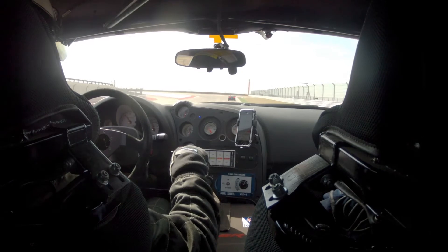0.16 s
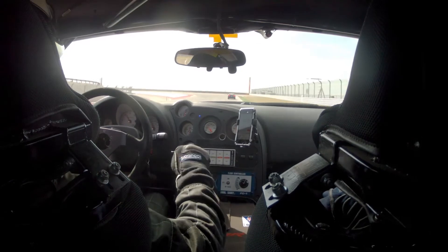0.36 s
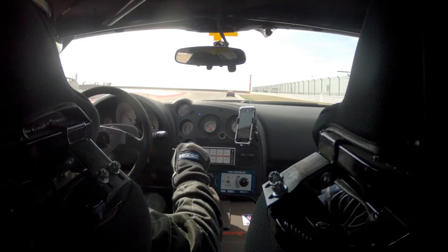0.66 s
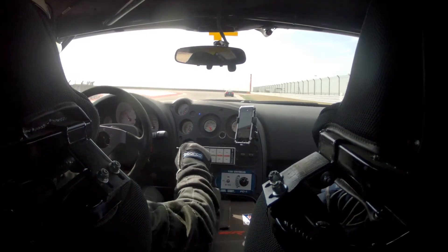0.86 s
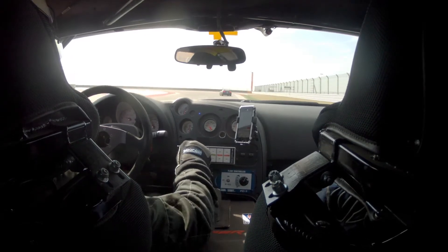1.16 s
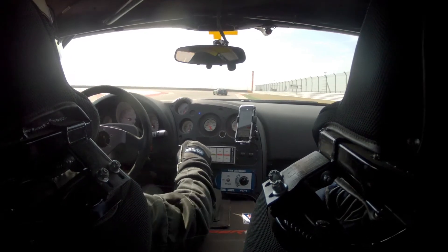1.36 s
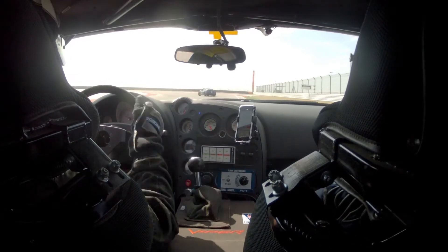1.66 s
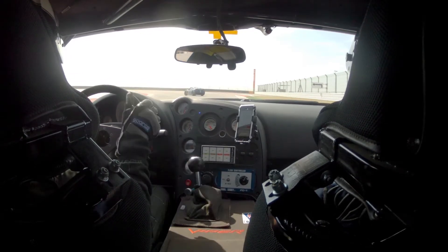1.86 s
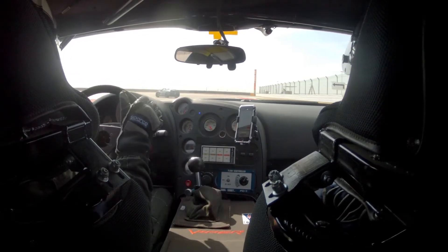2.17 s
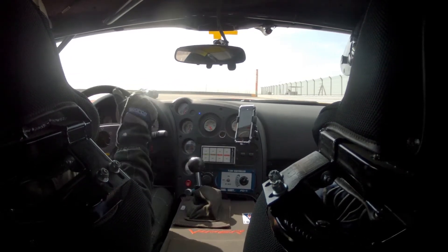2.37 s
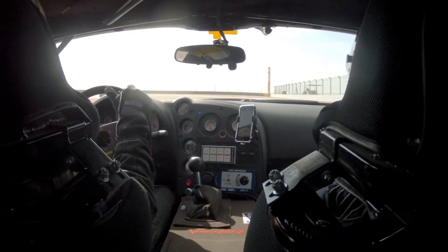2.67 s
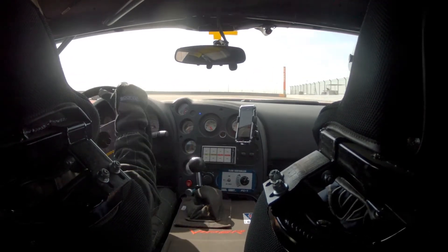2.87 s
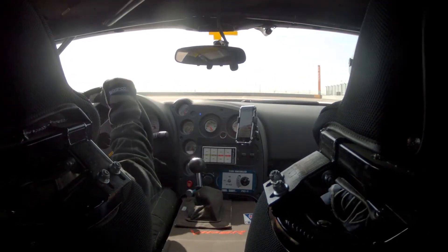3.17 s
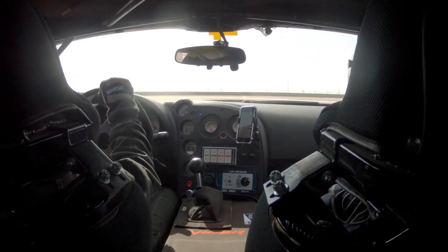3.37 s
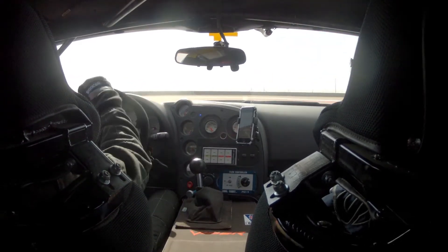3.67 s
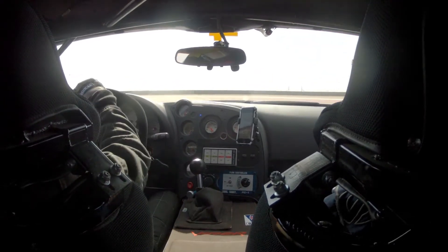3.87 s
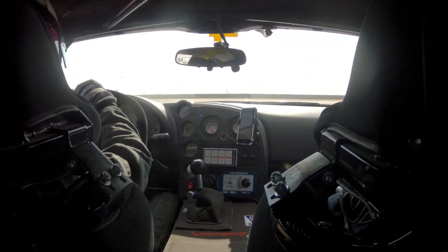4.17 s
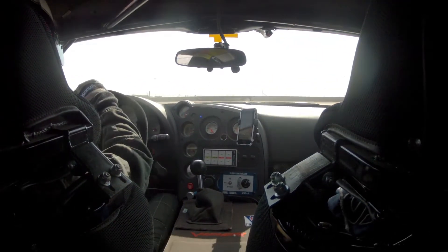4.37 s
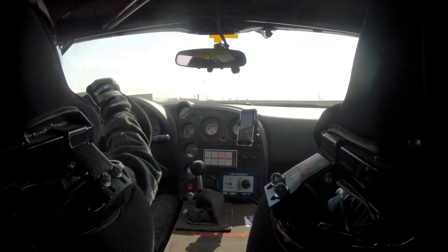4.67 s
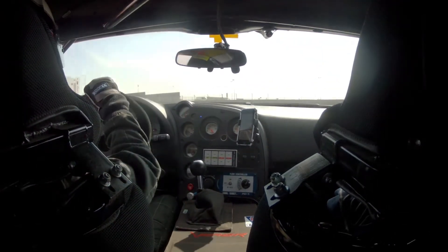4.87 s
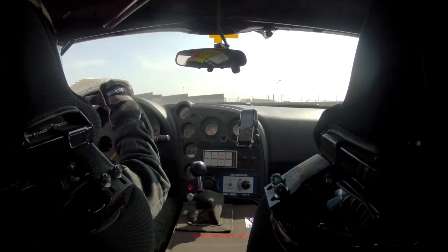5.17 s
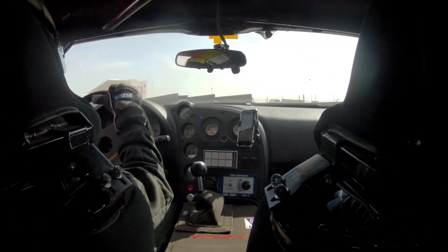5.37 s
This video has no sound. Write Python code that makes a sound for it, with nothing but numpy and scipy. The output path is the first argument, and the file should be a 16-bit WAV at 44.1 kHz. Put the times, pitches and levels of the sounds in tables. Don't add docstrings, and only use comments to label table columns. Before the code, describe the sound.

Inside a race car cabin, a deep booming engine brakes down from high revs, blips for a downshift, coasts lower, then pulls away as stones crack underneath.

```python
import sys
import numpy as np
from scipy import signal
from scipy.fft import rfft, irfft, next_fast_len
from scipy.io import wavfile
from scipy.ndimage import uniform_filter1d

SR = 44100
rng = np.random.default_rng(int(sys.argv[2]) if len(sys.argv) > 2 else 0)


def gain_from_decibels(decibels):
    exponent = np.asarray(decibels, float) / 20
    return 10 ** exponent


def waveform_to_disk(signal):
    frames = np.transpose(np.atleast_2d(signal))
    scaled = np.clip(frames, -1, 1) * 32767
    samples = np.round(scaled).astype(np.int16)
    wavfile.write(sys.argv[1], SR, samples)


N = 243873
TONE_STEP = 8

# time_s, firing_hz
FIRING_RATE = [(0, 174.4), (.4, 177), (.52, 172), (.8, 167), (1.12, 133), (1.29, 125.5), (1.45, 151.5),
               (1.59, 188.5), (1.73, 171.5), (2.0, 162), (2.45, 141), (2.85, 120.5), (3.38, 103.8),
               (4.18, 101.5), (4.35, 104.8), (4.73, 107), (4.95, 112.5), (5.53, 119.7)]
# time_s, load (1 full throttle, 0 coasting in gear, below 0 clutch in)
ENGINE_LOAD = [(0, 1), (.27, 0.77), (.39, -0.023), (.85, -0.08), (1.05, -0.31), (1.22, -0.7), (1.33, 0.27),
               (1.44, 0.8), (1.53, 0.19), (1.7, 0.17), (1.9, 0.12), (2.7, -0.097), (4.1, 0.14), (4.27, .75),
               (4.75, 0.71), (5.1, 1), (5.3, 0.92), (5.53, 0.97)]
# time_s, speed_kmh
ROAD_SPEED = [(0, 165), (.6, 139), (1.65, 106.3), (3.4, 67), (4.2, 71), (5.53, 104)]

# tone_hz, coasting_db, full_throttle_db
FIRING_GAIN = [(96.4, -23, -22), (105, -18.5, -12.5), (114.2, -14.5, -13.5), (122, -13.5, -13.5),
               (125.8, -18.5, -12), (141, -13.5, -14.5), (150, -11, -10), (182.5, -14.5, -14.5)]
# tone_hz, coasting_db, full_throttle_db
SECOND_GAIN = [(197.5, -37.5, -30.5), (227, -30, -24.5), (238.7, -34.5, -25), (253.5, -28, -24),
               (256.6, -36.5, -28), (325.5, -27.5, -20.5), (339, -38, -23), (343, -37, -19.5)]
# tone_hz, coasting_db, full_throttle_db
THIRD_GAIN = [(300, -49, -40), (324.6, -37.5, -19), (349, -51.5, -28), (372, -43, -36.5), (450, -47.5, -33),
              (544, -44, -48)]
# firing_hz, coasting_db, full_throttle_db
CRANK_GAIN = [(104, -50.5, -23.5), (120, -39.5, -35), (166, -36, -34), (187, -36, -22.5)]
# turns_per_rev, level_db
CRANK_ORDERS = [(1, 10.5), (2, -6.5), (3, -12.5), (4, -4.5), (6, -4.5), (7, -5.5), (8, -1), (9, -1),
                (11, -4), (14, -1.5), (19, 0.5), (20, 0), (21, -3.5), (24, -2.5), (25, 0.5), (27, -12),
                (29, -13.5), (30, -3), (35, 0.5), (38, -6), (40, -3), (45, 0.5), (50, -4)]
# time_s, boom_db, half_length_s
DRIVE_STUMBLES = [
    (0.402, -6, 0.023),
    (1.279, -8.5, 0.056),
    (1.576, -7.5, 0.051),
    (3.45, -0.5, 0.075),
    (3.753, -3, 0.043),
    (3.818, 3.5, 0.03),
    (3.897, -6, 0.065),
    (4.016, -10, 0.1),
]

# centre_hz, width_hz, gain_db
CABIN_PANELS = [(733.4, 30, 11.5), (830, 55, 3.5), (1022, 62, 6), (145.4, 42, 10.5), (320, 29, 8.5)]
# tone_hz, left_minus_right_db, left_lead_rad
STANDING_WAVES = [(100, -6, -.3), (106, -4.4, -.45), (112, -2.6, -.8), (121, -2.3, -1.35), (130, -8, -2.2),
                  (140, -6, -1.35), (153, -1.2, -.95), (163, -3, -.6), (173, -8, -.5), (185, -9.5, -.65),
                  (210, -7, -.7), (240, -1.2, -.05), (330, -3, .4), (600, -2.2, .05)]
# freq_hz, likeness_0_1
NOISE_LIKENESS = [(30, .7), (75, 0.63), (500, 1), (1000, 0.6), (1600, 0.83), (2500, 0.7), (4000, 0.38),
                  (6500, 0.25), (12000, .22)]
# freq_hz, left_lead_rad
NOISE_LEAD = [(40, 0.11), (500, -1.38), (1600, 0.61), (4000, 0.55), (7000, .68)]
# freq_hz, left_minus_right_db
NOISE_BALANCE = [(30, -5.5), (100, -1.5), (250, -1.5), (1000, -3), (2000, -2.5), (4000, -2.5), (8000, -0.3),
                 (12000, -1)]

# freq_hz, density_db_per_hz
RUMBLE_SPECTRUM = [(10, -20), (22, -1.5), (40, 12), (52, -2), (65, 3.5), (85, -8), (130, -44), (220, -120)]
# freq_hz, density_db_per_hz
BODY_SPECTRUM = [(50, -34), (80, -2), (150, 5), (200, -5), (260, -9), (400, -9), (600, -38), (900, -120)]
# freq_hz, density_db_per_hz
ROAR_SPECTRUM = [(150, -21), (380, -8.5), (510, -8.5), (690, 0.5), (770, -5.5), (830, -1.5), (1050, -4),
                 (1300, -9), (1650, -11), (2200, -22.5), (3000, -32.5), (4500, -45.5), (6500, -110)]
# freq_hz, density_db_per_hz
HISS_SPECTRUM = [(600, -65.5), (1200, -4), (2300, -0.5), (3200, -7.5), (4300, -12), (5700, -19),
                 (8000, -28.5), (12000, -53.5), (15000, -91)]
# freq_hz, density_db_per_hz
AIR_SPECTRUM = [(3000, -41.5), (5500, -2.5), (8000, -3.5), (10500, -5.5), (13000, -14), (15500, -30)]
# time_s, rumble_db, half_length_s
ROUGH_PATCHES = [(0, -37, 0.048), (.8, -30, 0.29), (1.288, -22.5, 0.08), (1.61, -21, 0.043),
                 (2.147, -31.5, .08), (2.544, -33, 0.03), (3.466, -31, .05), (4.25, -39, .1),
                 (4.89, -31, 0.055), (5.1, -24, 0.12)]
# time_s, gust_db, half_length_s
WIND_GUSTS = [
    (.58, 2, .06),
    (2.404, 4, 0.26),
]

# time_s, knock_db, thud_db, crack_db
STONE_STRIKES = [(0.5312, -18, -31, -53.5), (0.5832, -20.5, -38, -52.5), (0.8685, -14, -16, -38.5),
                 (0.9494, -15, -19, -46.5), (2.7594, -34, -33, -55.5), (3.1374, -51, -45, -55),
                 (3.214, -29.5, -38, -45.5), (3.357, -24, -37, -44.5), (3.4233, -22.5, -22.5, -41.5),
                 (3.4414, -28, -15, -50), (3.483, -14, -19.5, -45.5), (3.801, -9, -18, -55),
                 (3.887, -20.5, -32, -41.5), (3.9738, -40, -31, -51.5), (3.996, -15, -11, -49),
                 (4.0133, -34, -18, -60.5), (4.0694, -50, -37, -55.5), (4.151, -42, -26, -50.5),
                 (4.1733, -10.5, -17.5, -52.5), (4.2114, -28.5, -31, -42), (4.3312, -8, -16.5, -46.5),
                 (4.8982, -15, -19.5, -45.5), (4.9732, -25, -17.5, -47.5), (5.015, -13, -16, -47),
                 (5.1215, -12, -22, -46.5), (5.1615, -15, -19, -48), (5.178, -21, -17, -48),
                 (5.2775, -13.5, -19, -41.5)]
# freq_hz, density_db_per_hz
KNOCK_SPECTRUM = [(900, -51.5), (1300, -7.5), (1640, 6), (1900, -5.5), (2400, -24), (3500, -57),
                  (5000, -110)]
# freq_hz, density_db_per_hz
THUD_SPECTRUM = [(150, -38.5), (400, -6), (700, -7), (1050, -3.5), (1300, -10), (2000, -20), (3000, -61),
                 (4500, -110)]
# freq_hz, density_db_per_hz
SNAP_SPECTRUM = [(1300, -41.5), (2200, 1), (2600, 0.5), (3500, -1), (4800, -6.5), (6000, -22.5),
                 (9000, -63), (12000, -110)]
# freq_hz, density_db_per_hz
CRACK_SPECTRUM = [(2500, -42.5), (5000, -4.5), (7000, 1), (10000, -2.5), (13000, -9), (15500, -15)]

# start_s, end_s, centre_hz, width_hz, level_db, likeness_0_1
RESONANCES = [
    (0.88, 1.4, 9500, 45, -64, .3),
    (1.27, 1.38, 10700, 260, -60, 0.2),
    (2.17, 2.72, 9480, 50, -67, .3),
    (4.8, 5.33, 49, 3.2, -29, 0.9),
    (1.51, 1.59, 735, 43, -27.5, 0.8),
    (1.37, 1.46, 1030, 250, -28, 0.9),
    (4.326, 4.348, 2550, 310, -28, 0.5),
    (.949, .968, 1620, 200, -28, 0.7),
    (4.3, 5.53, 2520, 330, -49, 0.6),
    (4.5, 5.53, 8200, 900, -63, 0.4),
]


def evened(x):
    return x / np.sqrt(np.mean(x ** 2) + 1e-20)


def read(points, hz, column=1):
    table = np.transpose(points)
    return np.interp(np.log(hz + 1), np.log(table[0] + 1), table[column])


def curve(rows, column=1, step=1):
    table = np.transpose(rows)
    return np.interp(np.arange(0, N, step) / SR, table[0], table[column])


def swell(time_s, half_s, step=1):
    return np.exp(-((np.arange(0, N, step) / SR - time_s) / half_s) ** 2)


def waver(rate_hz, count):
    knots = rng.standard_normal((count, 400))
    position = np.arange(0, N, TONE_STEP) / SR * rate_hz
    return [np.interp(position, np.arange(len(row)), row) for row in knots]


def wash(spectrum, patchy_db, flicker_db, size=1024):
    frames = 4 * N // size + 5
    hz = np.fft.rfftfreq(size, 1 / SR)
    a, b, c, d, patches = rng.standard_normal((frames, len(hz), 5)).T
    patches = uniform_filter1d(patches, size=10, axis=0)
    patches = evened(uniform_filter1d(patches, size=10, axis=1))
    flicker = evened(uniform_filter1d(rng.standard_normal(frames), size=3))
    same = np.clip(read(NOISE_LIKENESS, hz), 0, 1)[:, None]
    left = a + 1j * b
    right = same * left + np.sqrt(1 - same ** 2) * (c + 1j * d)
    half = (gain_from_decibels(read(NOISE_BALANCE, hz) / 2) * np.exp(.5j * read(NOISE_LEAD, hz)))[:, None]
    gain_db = read(spectrum, hz)[:, None] + patchy_db * patches + flicker_db * flicker
    bins = np.array([left * half, right / half]) * gain_from_decibels(gain_db)
    pair = signal.istft(bins, nperseg=size, noverlap=3 * size // 4)[1][:, :N]
    return pair / np.std(pair.mean(0))


def rush(road_db, per_speed, intake_db, throttle_db, per_rev):
    rolling = gain_from_decibels(road_db) * (curve(ROAD_SPEED) / 100) ** per_speed
    throttle_gain = gain_from_decibels(intake_db + throttle_db * (curve(ENGINE_LOAD) - 1))
    gulping = throttle_gain * (curve(FIRING_RATE) / 120) ** per_rev
    return np.hypot(rolling, gulping)


def road():
    floor = gain_from_decibels(-33.5) * (curve(ROAD_SPEED) / 100) ** 1.1
    floor += sum(gain_from_decibels(db) * swell(time_s, half_s) for time_s, db, half_s in ROUGH_PATCHES)
    gust = gain_from_decibels(sum(db * swell(time_s, half_s) for time_s, db, half_s in WIND_GUSTS))
    roar = rush(-33, 1.56, -27, 12.5, 0.16)
    hiss = gust ** 0.71 * rush(-45.5, 2.12, -39, 29, 1.9)
    air = gust * rush(-64, 1.1, -53, 22, 1.3)
    out = gain_from_decibels(1.5) * floor * wash(RUMBLE_SPECTRUM, 0.76, .84, size=2048)
    out += gain_from_decibels(-21) * roar ** 0.22 * wash(BODY_SPECTRUM, 0.95, 1.0, size=2048)
    out += roar * wash(ROAR_SPECTRUM, 0.94, 0.65)
    out += hiss * wash(HISS_SPECTRUM, 0.96, 0.27, size=512)
    out += air * wash(AIR_SPECTRUM, 1.2, 0.73, size=512)
    return out


def resonate(x, hz, width_hz):
    r = np.exp(-np.pi * width_hz / SR)
    return 2 * signal.lfilter([1 - r], [1, -r * np.exp(2j * np.pi * hz / SR)], x).real


def singing_parts():
    out = np.zeros((2, N))
    for start_s, end_s, hz, width_hz, db, same in RESONANCES:
        at = round(start_s * SR)
        size = round((end_s - start_s) * SR)
        a, b = rng.standard_normal((2, size + SR // 4))
        pair = np.array([a, same * a + np.sqrt(1 - min(same, 1) ** 2) * b])
        ringing = resonate(resonate(pair, hz, width_hz), hz, width_hz)
        sing = evened(ringing[:, -size:])
        out[:, at:at + size] += gain_from_decibels(db) * sing * signal.windows.tukey(size, .6)
    return out


def strike(t, level_db, attack_s, decay_60db_s):
    return gain_from_decibels(level_db) * np.minimum(t / attack_s, 1) * gain_from_decibels(-60 * t / decay_60db_s)


def stones():
    t = np.arange(4400) / SR
    knock = strike(t, -8.0, 0.0033, 0.04) + 0.22 * strike(t, -8.0, 0.0033, 0.19)
    thud = strike(t, -7.0, 0.0029, 0.2)
    snap = strike(t, -1.0, 0.0004, 0.14)
    crack = strike(t, 2.5, .0008, 0.094)
    shapes = np.array([knock, thud, snap, crack])
    envelopes = np.zeros((len(shapes), 2, N + len(t)))
    for time_s, knock_db, thud_db, crack_db in STONE_STRIKES:
        snap_db = -0.1 + 0.51 * knock_db + .51 * crack_db
        levels = gain_from_decibels(np.array([knock_db, thud_db, snap_db, crack_db]))
        pan_db = -5.5 - 0.15 * knock_db
        sides = gain_from_decibels((pan_db + 3.0) / 2) ** np.array([[1], [-1]])
        at = round((time_s - .0015) * SR)
        envelopes[..., at:at + len(t)] += (levels[:, None] * shapes)[:, None] * sides
    size = next_fast_len(N)
    hz = np.fft.rfftfreq(size, 1 / SR)
    white = rfft(wash([(20, 0), (20000, 0)], .6, .6, size=512), size)
    out = np.zeros((2, N))
    spectra = (KNOCK_SPECTRUM, THUD_SPECTRUM, SNAP_SPECTRUM, CRACK_SPECTRUM)
    for envelope, spectrum in zip(envelopes, spectra):
        rattle = evened(irfft(white * gain_from_decibels(read(spectrum, hz)), size)[:, :N])
        out += envelope[:, :N] * rattle
    return out


def under_load(table, hz):
    coasting_db = read(table, hz)
    full_db = read(table, hz, column=2)
    return coasting_db + curve(ENGINE_LOAD, step=TONE_STEP) * (full_db - coasting_db)


def in_cabin(turns, hz, db):
    lead_rad = read(STANDING_WAVES, hz, column=2)
    half = gain_from_decibels(read(STANDING_WAVES, hz) / 2) * np.exp(.5j * lead_rad)
    pair = np.array([half, 1 / half])
    tone = pair / abs(pair.mean(0)) * np.exp(2j * np.pi * turns)
    return np.sqrt(2) * gain_from_decibels(db) * tone.real


def firing_boom(turns, hz):
    shake = waver(32., count=3)
    stumble_db = sum(db * swell(time_s, half_s, step=TONE_STEP) for time_s, db, half_s in DRIVE_STUMBLES)
    first_db = under_load(FIRING_GAIN, hz) + stumble_db + 0.2 * shake[0]
    second_db = under_load(SECOND_GAIN, 2 * hz) + 0.2 * stumble_db + 0.91 * shake[2]
    third_db = under_load(THIRD_GAIN, 3 * hz) + 1.6 * shake[1]
    out = in_cabin(turns + 0.0037 * shake[1], hz, first_db)
    out += in_cabin(2 * turns + 0.37, 2 * hz, second_db)
    out += in_cabin(3 * turns + 0.75, 3 * hz, third_db)
    return out


def crank_orders(turns, firing_hz):
    drift = waver(8., count=2 * len(CRANK_ORDERS))
    load_db = under_load(CRANK_GAIN, firing_hz)
    out = 0
    for k, (order, db) in enumerate(CRANK_ORDERS):
        ratio = order / 5
        hz = ratio * firing_hz
        lift = sum(gain_from_decibels(2 * gain_db) / (1 + (2 * (hz - centre_hz) / width_hz) ** 2)
                   for centre_hz, width_hz, gain_db in CABIN_PANELS)
        colour_db = 10 * np.log10(1 + lift) + 0.58 * read(ROAR_SPECTRUM, np.maximum(hz, 400))
        share = np.clip(order / 22, .25, 1)
        drift_db = 2.6 if order % 5 == 0 else 4.5
        level_db = db - 45 + share * (load_db + 37) + colour_db + drift_db * drift[2 * k]
        smeared_turns = ratio * turns + 0.09 * drift[2 * k + 1]
        out = out + in_cabin(smeared_turns, hz, level_db)
    return out


def engine():
    hz = uniform_filter1d(curve(FIRING_RATE, step=TONE_STEP), size=200)
    turns = np.cumsum(hz) * TONE_STEP / SR
    tones = firing_boom(turns, hz) + crank_orders(turns, hz)
    full_rate = signal.resample_poly(tones, TONE_STEP, 1, axis=1, window=("kaiser", 11.), padtype="reflect")
    return full_rate[:, :N]


def scene():
    return road() + singing_parts() + stones() + engine()


def top_cut(x):
    return signal.sosfilt(signal.butter(12, 15800, fs=SR, output="sos"), x)


def record(dry):
    limited = 1.171 * np.tanh(dry / 1.18)
    limited = limited * np.minimum(np.arange(N)[::-1] / (.003 * SR), 1)
    dulled = signal.sosfilt(signal.butter(3, 13500, fs=SR, output="sos"), limited)
    return top_cut(dulled)


dry = scene()
out = record(dry)
waveform_to_disk(out)
```